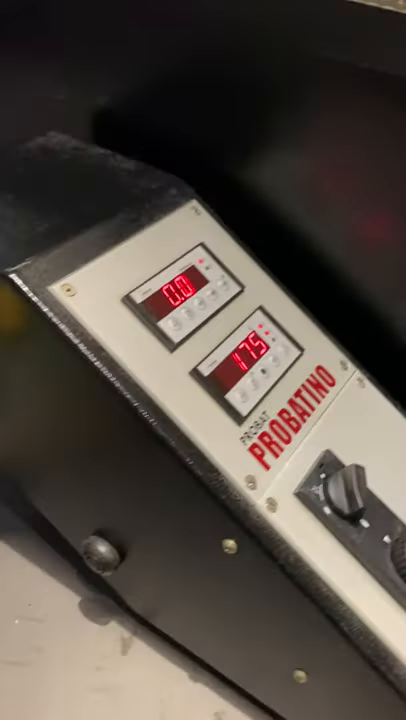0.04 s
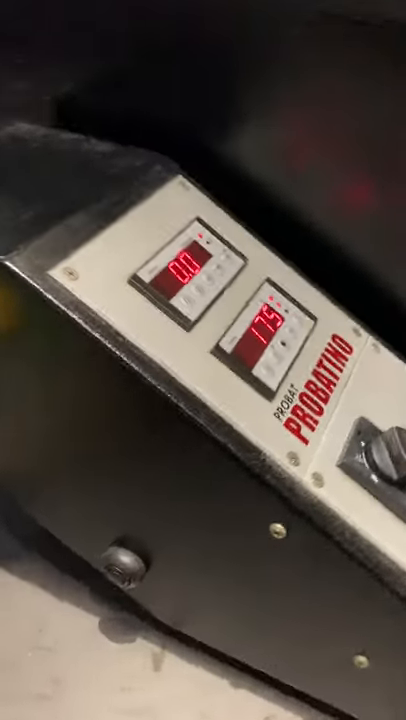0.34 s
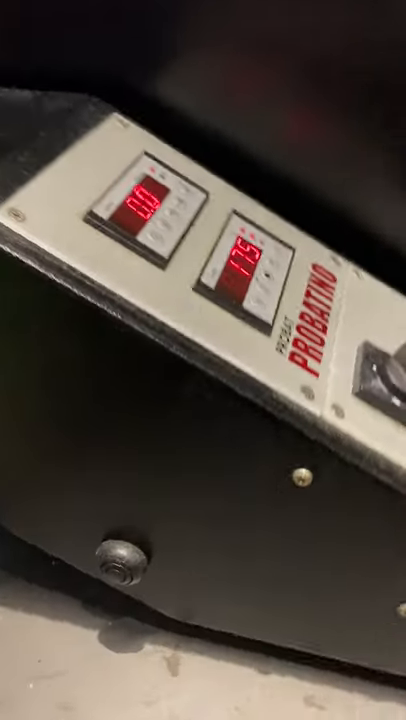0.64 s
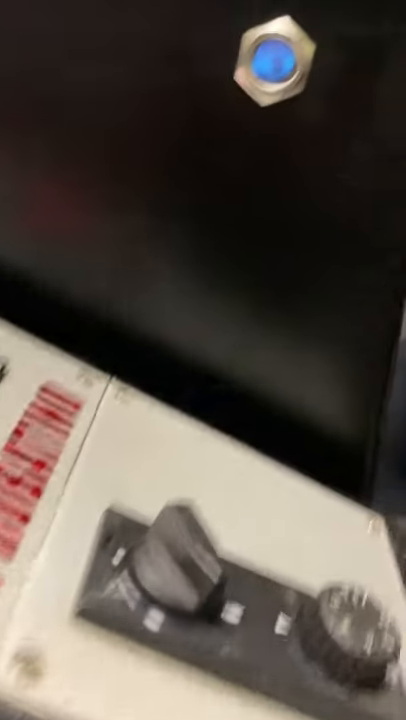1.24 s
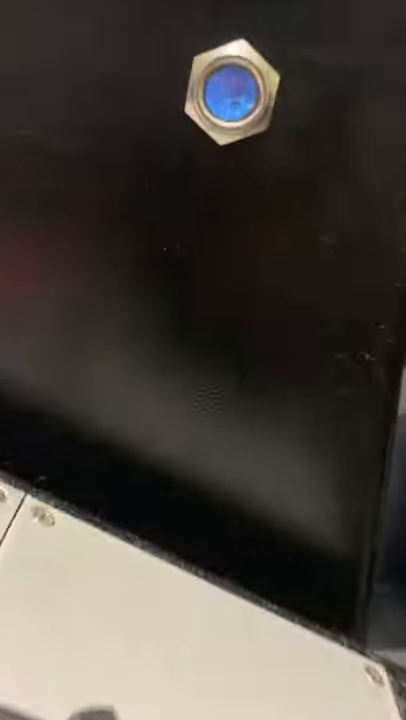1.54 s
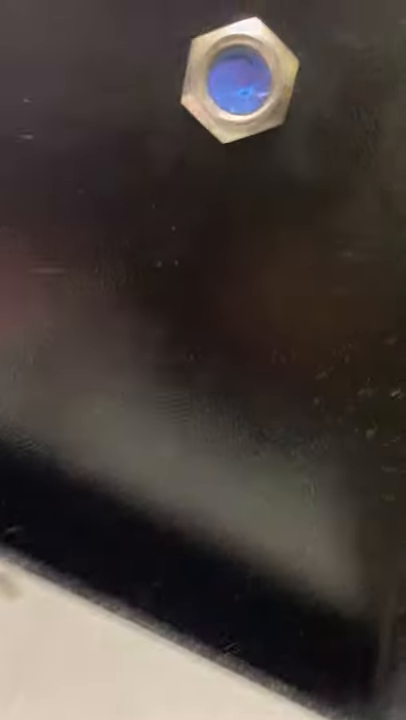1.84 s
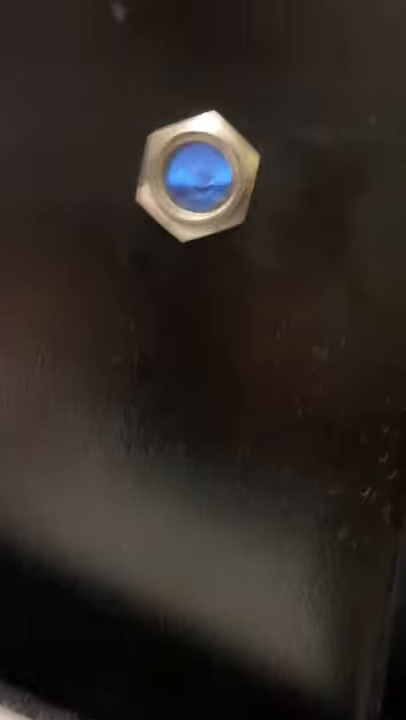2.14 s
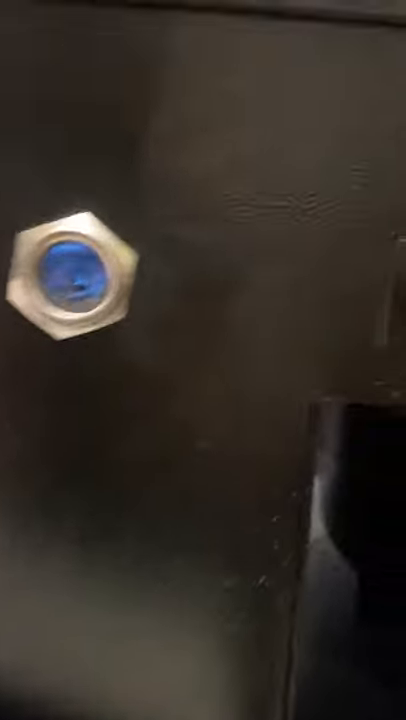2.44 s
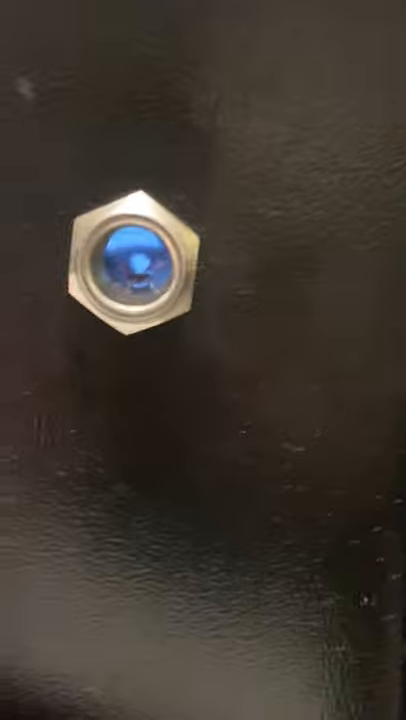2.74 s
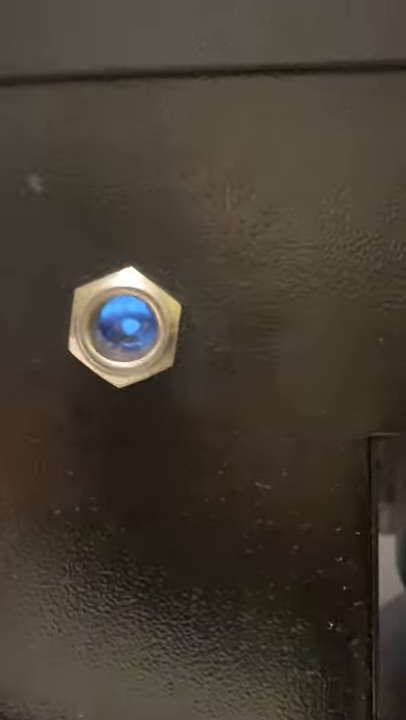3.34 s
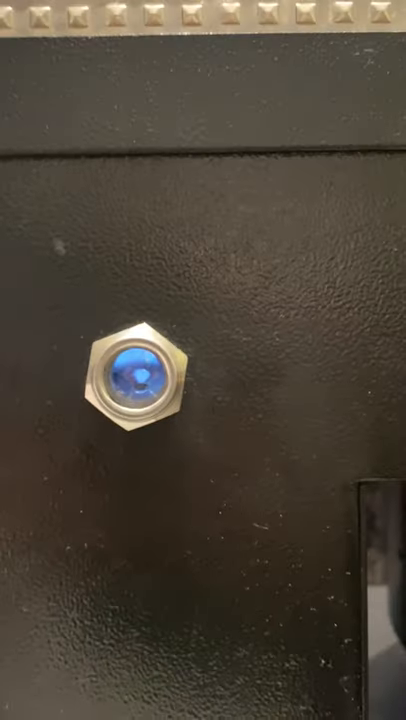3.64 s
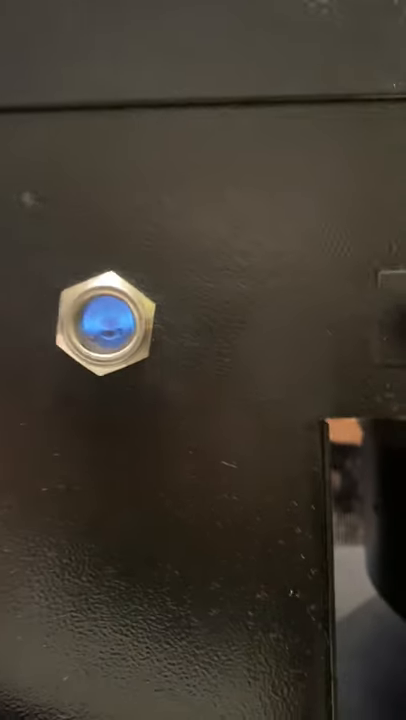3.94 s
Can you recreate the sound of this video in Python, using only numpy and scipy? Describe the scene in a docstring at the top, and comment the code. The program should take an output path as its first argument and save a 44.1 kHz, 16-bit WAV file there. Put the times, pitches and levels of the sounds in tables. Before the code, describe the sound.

A small coffee roaster rumbles and hums in a room, its faint gas hiss fading as the close microphone moves along it. Late on, two rapid hollow knocks hit the housing, followed by a softer, more distant metal clack.

```python
"""A small coffee roaster runs indoors: a burner rumbling with two wavering duct tones, motor hum,
fan whirr, gas hiss and two faint drum squeaks. The microphone moves from the control panel to the
side of the housing, so the rumble grows and the hiss falls back. Two quick knocks ring the housing
close by; a little later a metal part clacks further off in the room."""
import sys
import numpy as np
from scipy import signal
from scipy.fft import rfft, irfft, next_fast_len
from scipy.io import wavfile
from scipy.ndimage import uniform_filter1d, map_coordinates

SR = 44100
rng = np.random.default_rng(int(sys.argv[2]) if len(sys.argv) > 2 else 0)


def unload_audio(sound):
    """Save the sound as a 16-bit wav file, at the path given as the first command line argument."""
    columns = np.transpose(np.atleast_2d(sound))
    # keep every value between -1 and 1, then stretch to whole-number steps
    steps = np.round(np.clip(columns, -1, 1) * 32767)
    wavfile.write(sys.argv[1], SR, steps.astype(np.int16))


N = 176400

# Microphone path, 0 at the panel to 1 at the side: time_s, nearness
MIC_PATH = [(0, 0.027), (.85, 0.11), (1.3, 0.4), (1.8, 0.69), (2.45, 0.8), (3.3, 0.86), (4, 0.72)]
# Microphone turn: time_s, left_minus_right_db
MIC_TURN = [(3, -0.5), (3.8, -2)]
# Likeness of the two microphone ports: freq_hz, coherence
PORT_COHERENCE = [(100, .98), (270, .93), (450, .72), (1100, .42), (2100, .6), (4700, .5), (6200, .84),
                  (15000, .8)]
# Phase between the ports: freq_hz, left_lead_rad
PORT_LEAD = [(400, 0), (3200, .9), (5300, .6), (7200, 3.1), (15800, 11.9)]
# Balance of the ports: freq_hz, left_minus_right_db
PORT_BALANCE = [(60, -1.5), (150, 0.5), (400, -2), (850, 0), (1400, 3.5), (2500, 1)]
# Drum squeaks: centre_s, pitch_hz, level_db
DRUM_SQUEAKS = [(.16, 4640, -50), (.46, 4800, -54)]
# Contacts of the metal part: start_s, level_db
METAL_CONTACTS = [(3.262, -29.5), (3.271, -27.5), (3.276, -28), (3.288, -34.5)]
# Colour of the metal part: freq_hz, gain_db
METAL_SPECTRUM = [(600, -13), (1400, 3.5), (2150, -7), (2440, 10.5), (2800, -8), (3900, -2), (4800, 2),
                  (6000, -6.5), (9000, -11.5), (15500, -14)]
# Blows on the housing: start_s, level_db
HOUSING_BLOWS = [(2.7017, -11), (2.7158, -14.5)]
# Housing modes: pitch_hz, gain_db, t60_s
HOUSING_MODES = [(306, -8, 0.078), (439, 6.5, 0.021), (904, -13.5, .04)]
# Colour of a blow's tick: freq_hz, gain_db
TICK_SPECTRUM = [(3500, -22), (6500, -1), (9500, -3), (12000, -10), (16000, -8)]
# Gas hiss at the side: freq_hz, density_db
HISS_SPECTRUM = [(4500, -120), (6150, -86.5), (7200, -104.5), (8700, -91.5), (9800, -95.5), (10600, -92.5),
                 (12400, -95), (14400, -102), (15000, -99), (15700, -104)]
# Fan rush at the side: freq_hz, density_db
FAN_SPECTRUM = [(90, -95), (190, -60), (350, -64.5), (620, -75), (950, -76.5), (1400, -76.5), (2400, -80),
                (3000, -82.5), (4000, -85), (5100, -86), (5700, -93), (7000, -120)]
# Swell of the fan rush: time_s, gain_db
FAN_GAIN = [(0, .5), (1.5, -0.5), (2.7, 1), (3.4, 1.5), (4, 1)]
# Fan casing resonances: centre_hz, width_hz, panel_density_db, side_density_db
CASING_MODES = [(476.6, 89, -62.5, -63), (866, 27, -84, -65), (1089, 89, -71, -76), (1860, 190, -78, -85),
                (2648, 126, -72.5, -76), (3620, 85, -87, -77.5), (4786, 300, -82, -82)]
# Motor and bearing tones: pitch_hz, panel_db, side_db
MOTOR_TONES = [(59.4, -37.5, -35.5), (190, -40.5, -47), (759, -61, -56), (840, -59, -53),
               (877.6, -64, -49.5), (909, -64, -57), (1486, -54.5, -68), (1604, -61, -65), (1723, -60, -66),
               (1844, -59, -65), (3617, -73, -57), (3674, -73, -62.5)]
# First duct resonance: time_s, level_db
DUCT_FUNDAMENTAL = [(0.0, -39), (0.1, -26), (0.24, -40), (0.4, -26), (0.52, -31.5), (0.98, -38.5),
                    (1.12, -26.5), (1.22, -44), (1.44, -34.5), (1.7, -27), (2.02, -37), (2.14, -30),
                    (2.26, -36.5), (2.46, -22), (2.62, -34.5), (3.0, -32.5), (3.14, -24.5), (3.6, -40),
                    (3.74, -31.1), (4.0, -38)]
# Its octave: time_s, level_db
DUCT_OCTAVE = [(0, -42), (.12, -34), (.61, -42), (.72, -30), (.89, -43), (1.0, -25.5), (1.09, -42),
               (1.2, -30), (1.72, -26), (1.94, -36), (2.19, -28), (2.27, -41), (2.37, -22), (2.55, -31),
               (2.92, -23), (3.08, -31), (3.3, -25.5), (4, -30)]
# Burner rumble at the side: freq_hz, density_db
BURNER_SPECTRUM = [(18, -105), (35, -61), (48, -55.5), (70, -54.5), (90, -44.5), (140, -49), (170, -53.5),
                   (210, -49), (290, -56.5), (390, -60), (470, -64.5), (630, -67.5), (740, -64),
                   (1000, -80), (1500, -120)]


def amp(db):
    """Decibels to gain."""
    return 10 ** (np.asarray(db) / 20)


def unit_rms(x):
    """Scale to rms 1."""
    return x / np.sqrt(np.mean(x ** 2) + 1e-20)


def at_hz(rows, hz):
    """Interpolate (freq_hz, value) rows on a log axis."""
    freq_hz, values = np.transpose(rows)
    return np.interp(np.log(hz + 1), np.log(freq_hz + 1), values)


def curve(rows):
    """One value per sample from (time_s, value) rows."""
    return np.interp(np.arange(N) / SR, *np.transpose(rows))


def wobble(rate_hz):
    """Smooth random curve, rate_hz knots a second."""
    return map_coordinates(rng.standard_normal(2000), [np.arange(N) * rate_hz / SR + 2], mode="mirror")


def filtered(x, response):
    """Apply a complex frequency response."""
    size = next_fast_len(N + SR // 2)
    return irfft(rfft(x, size) * response(np.fft.rfftfreq(size, 1 / SR)), size)[..., :N]


def decay(start_s, t60_s, attack_s):
    """Blow envelope: quick rise, exponential fall."""
    age_s = np.maximum(np.arange(N) / SR - start_s, 0)
    return (1 - np.exp(-age_s / attack_s)) * np.exp(-np.log(1000) * age_s / t60_s)


def coloured_noise(spectrum):
    """Shaped mono noise, rms 1."""
    return unit_rms(filtered(rng.standard_normal(N), lambda hz: amp(at_hz(spectrum, hz))))


def flow_noise(density_db, patchy_db):
    """Partly coherent stereo noise with random gain patches in time and frequency."""
    bins = signal.stft(rng.standard_normal((2, N)), nperseg=512)[2]
    patches = uniform_filter1d(rng.standard_normal(bins.shape[1:]), size=5, axis=0)
    patches = uniform_filter1d(patches, size=14, axis=1)
    pair = signal.istft(bins * amp(patchy_db * unit_rms(patches)), nperseg=512)[1][:, :N]

    def mid_side_gains(hz):
        width_rad = np.arccos(np.clip(at_hz(PORT_COHERENCE, hz), 0, 1)) / 2
        return amp(density_db(hz)) * [np.cos(width_rad), np.sin(width_rad)]

    mid, side = filtered(pair, mid_side_gains)
    return np.sqrt(SR / 2) * np.array([mid + side, mid - side])


def drum_squeaks(half_length_s=0.056):
    """Thin tones from the drum swell and fade."""
    t = np.arange(N) / SR
    return sum(amp(db) * np.exp(-((t - centre_s) / half_length_s) ** 2) * np.sin(2 * np.pi * hz * t)
               for centre_s, hz, db in DRUM_SQUEAKS)


def metal_clack(room_db=-12.5, room_top_hz=5270):
    """A loose metal part rattles shut; its ring hangs, duller, in the room."""
    direct_power = room_power = 0
    for start_s, db in METAL_CONTACTS:
        direct_power += (amp(db) * decay(start_s, t60_s=0.055, attack_s=0.0015)) ** 2
        room_power += (amp(db + room_db) * decay(start_s, t60_s=0.77, attack_s=0.011)) ** 2
    ring = np.array([coloured_noise(METAL_SPECTRUM) for _ in range(2)])
    ring = filtered(ring, lambda hz: 1 / np.sqrt(1 + (hz / room_top_hz) ** 8))
    return np.sqrt(direct_power) * coloured_noise(METAL_SPECTRUM) + np.sqrt(room_power) * ring


def housing_knocks(tick_db=-6.5):
    """Each blow gives a hard tick and a short hollow ring, left of centre."""
    t, out = np.arange(N) / SR, np.zeros(N)
    for start_s, db in HOUSING_BLOWS:
        ring = sum(amp(mode_db) * decay(start_s, t60_s, attack_s=0.00076)
                   * np.sin(2 * np.pi * hz * (start_s - t)) for hz, mode_db, t60_s in HOUSING_MODES)
        tick = coloured_noise(TICK_SPECTRUM) * decay(start_s, t60_s=0.0027, attack_s=0.00036)
        out += amp(db) * (ring + amp(tick_db) * tick)
    return out * amp([[1.5], [-1.5]])


def gas_hiss(at_panel, panel_db=5.5, falloff=3.8):
    """Directional gas hiss; drops quickly away from the panel."""
    noise = flow_noise(lambda hz: at_hz(HISS_SPECTRUM, hz), patchy_db=1.96)
    return noise * amp(panel_db * at_panel ** falloff + 0.38 * wobble(16) + 1.4 * wobble(70))


def fan_rush(at_panel, panel_db=1.5):
    """Broad rush of fan air, slowly swelling."""
    noise = flow_noise(lambda hz: at_hz(FAN_SPECTRUM, hz), patchy_db=1)
    return noise * amp(panel_db * at_panel + curve(FAN_GAIN) + 0.59 * wobble(11))


def fan_whirr(side_mix):
    """Air rings in the fan casing; some resonances carry to the panel, others to the side."""
    centre_hz, width_hz, panel_db, side_db = np.transpose(CASING_MODES)[..., None]

    def ringing(peak_db):
        def density_db(hz):
            peaks = amp(peak_db) / (1 + (2 * (hz - centre_hz) / width_hz) ** 2)
            return 20 * np.log10(peaks.max(axis=0))
        return flow_noise(density_db, patchy_db=1)

    return np.sqrt(1 - side_mix) * ringing(panel_db) + np.sqrt(side_mix) * ringing(side_db)


def motor_hum(side_mix, speed_wander=0.0005, flutter_db=2.6, rough_rad=0.45):
    """Shaft hum and slightly rough bearing whines share one unsteady speed."""
    shaft_time_s = np.cumsum(1 + speed_wander * wobble(4.88)) / SR
    out = np.zeros((2, N))
    for hz, panel_db, side_db in MOTOR_TONES:
        diffuse = np.sqrt(np.clip(1 - at_hz(PORT_COHERENCE, hz), 0, 1))
        level = amp(panel_db + (side_db - panel_db) * side_mix + flutter_db * diffuse * wobble(14))
        phase = 2 * np.pi * (hz * shaft_time_s + rng.random()) + rough_rad * diffuse * wobble(50)
        spread_rad = 0.39 * diffuse * wobble(2.49)
        out += np.sqrt(2) * level * np.sin([phase + spread_rad, phase - spread_rad])
    return out


def duct_tone(levels, pitch_hz, drift_hz, flutter_db, rate_hz):
    """The flame keeps a duct resonance ringing, unsteady in pitch and strength."""
    phase = 2 * np.pi * np.cumsum(pitch_hz + drift_hz * wobble(rate_hz)) / SR
    return np.sqrt(2) * amp(curve(levels) + flutter_db * wobble(rate_hz)) * np.sin(phase)


def burner_rumble(at_panel, panel_db=-6.5):
    """Low flame noise, loudest beside the housing."""
    noise = flow_noise(lambda hz: at_hz(BURNER_SPECTRUM, hz), patchy_db=0.5)
    return noise * amp(panel_db * at_panel + 0.54 * wobble(11))


def scene():
    """The roaster from a moving microphone, plus knocks and clack."""
    nearness = curve(MIC_PATH)
    at_panel = 1 - nearness
    side_mix = np.interp(nearness, (0.22, 0.84), [0, 1])  # panel tones give way to side tones
    duct = duct_tone(DUCT_FUNDAMENTAL, pitch_hz=122, drift_hz=1.6, flutter_db=1.2, rate_hz=14)
    duct += duct_tone(DUCT_OCTAVE, pitch_hz=244.3, drift_hz=1.7, flutter_db=1, rate_hz=18)
    air = burner_rumble(at_panel) + fan_rush(at_panel) + gas_hiss(at_panel)
    roaster = air + fan_whirr(side_mix) + motor_hum(side_mix) + duct + drum_squeaks()
    turn_gains = amp(np.outer([0.5, -0.5], curve(MIC_TURN)))
    return roaster * turn_gains + housing_knocks() + metal_clack()


def record(dry, top_hz=15830):
    """Two band-limited microphone ports, unequal in phase and level."""
    sides = np.array([[0.5], [-0.5]])

    def ports(hz):
        lead_rad = np.interp(hz, *np.transpose(PORT_LEAD))
        return np.exp(1j * sides * lead_rad) * amp(sides * at_hz(PORT_BALANCE, hz)) * (hz < top_hz)

    return filtered(dry, ports)


dry = scene()
out = record(dry)
unload_audio(out)
```